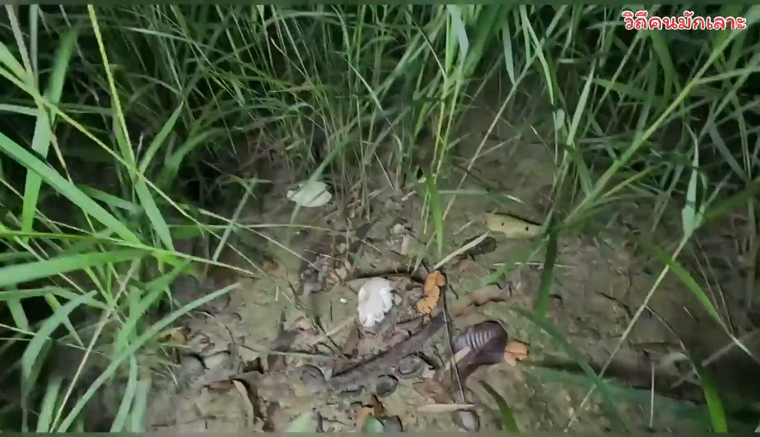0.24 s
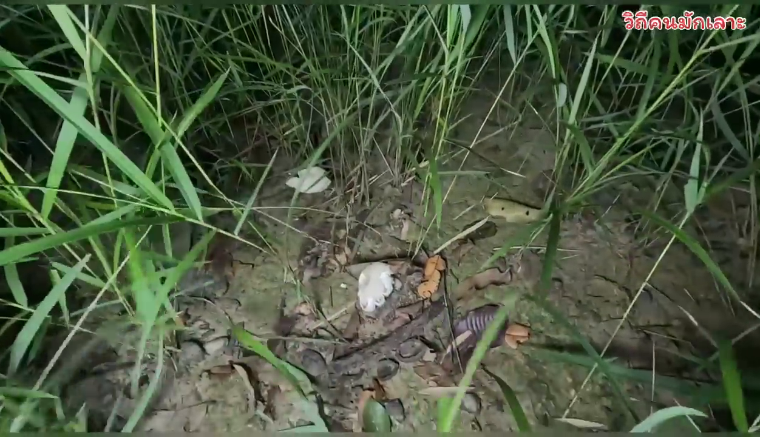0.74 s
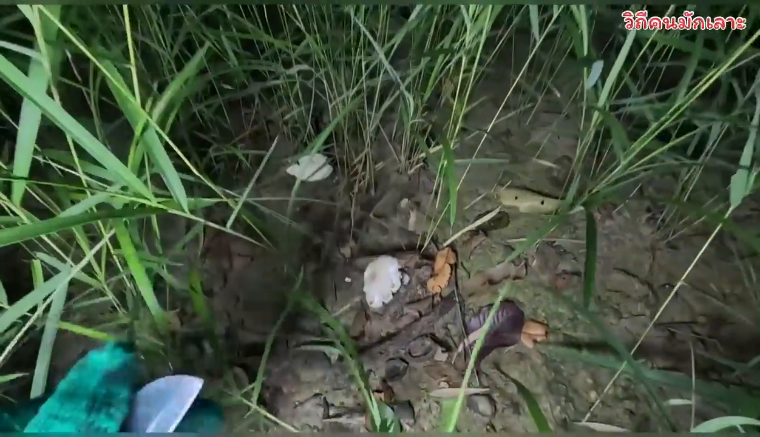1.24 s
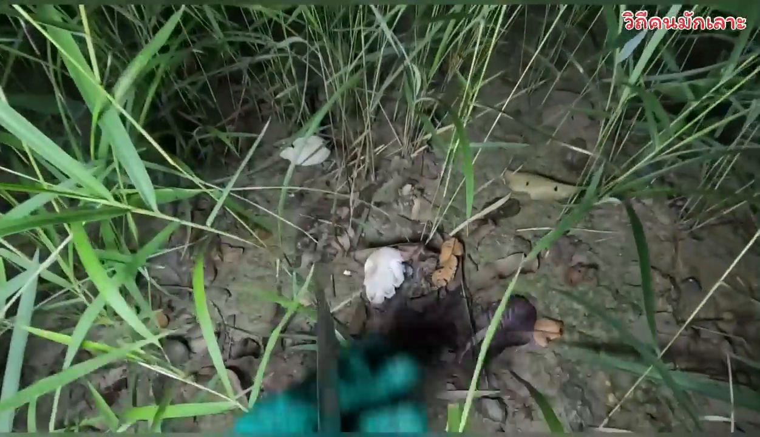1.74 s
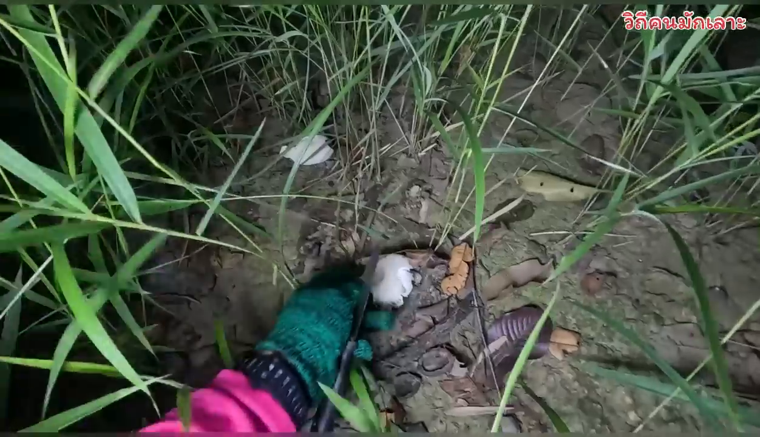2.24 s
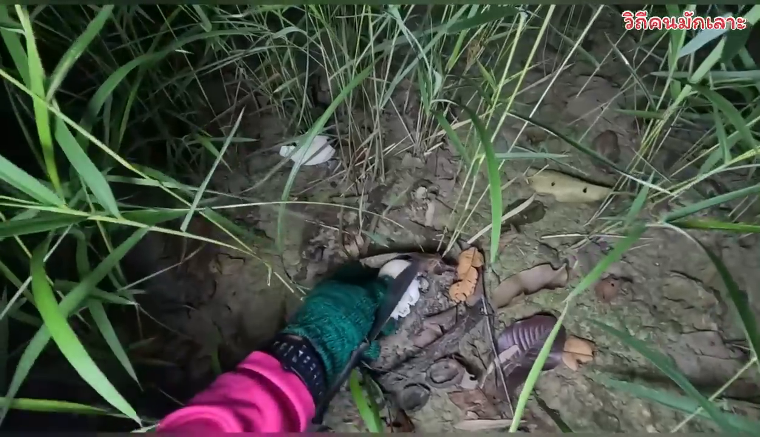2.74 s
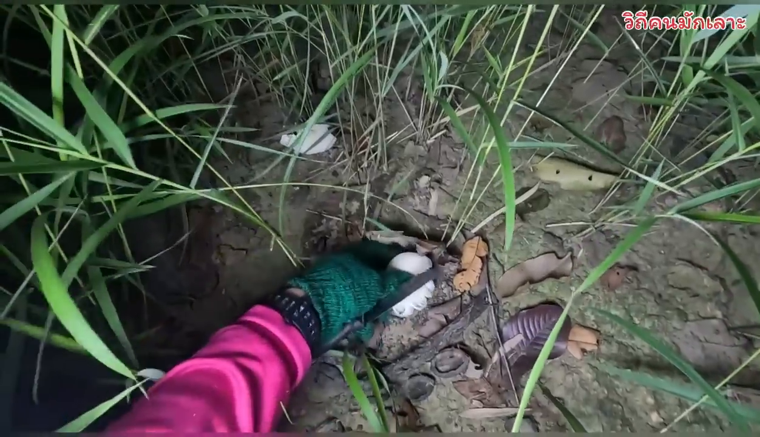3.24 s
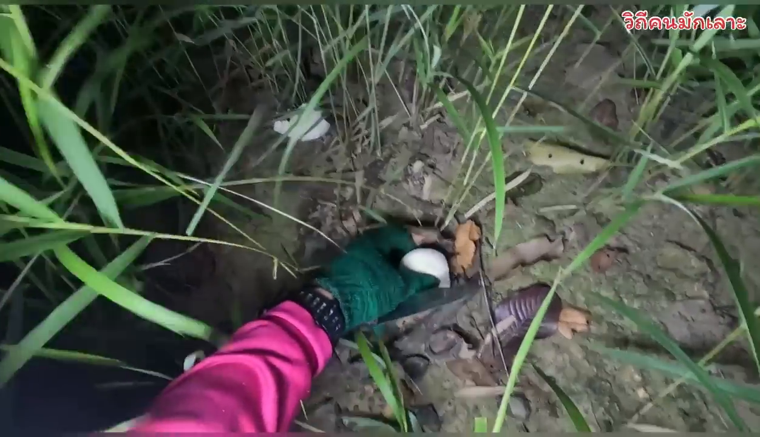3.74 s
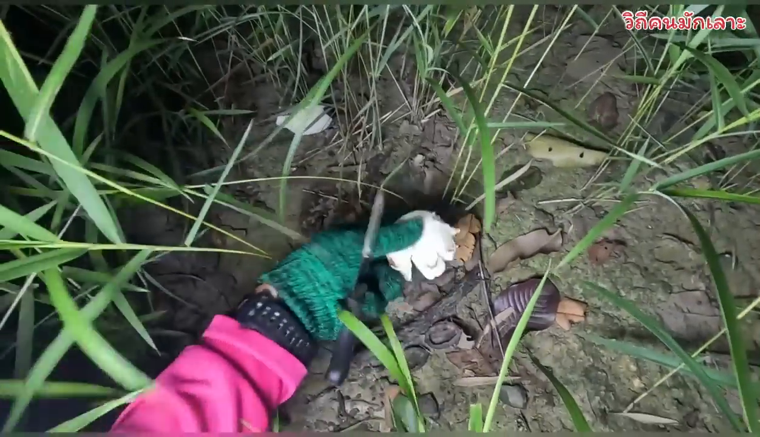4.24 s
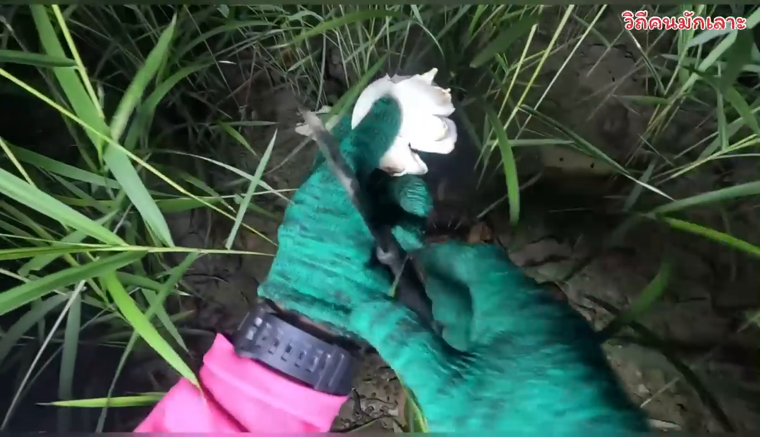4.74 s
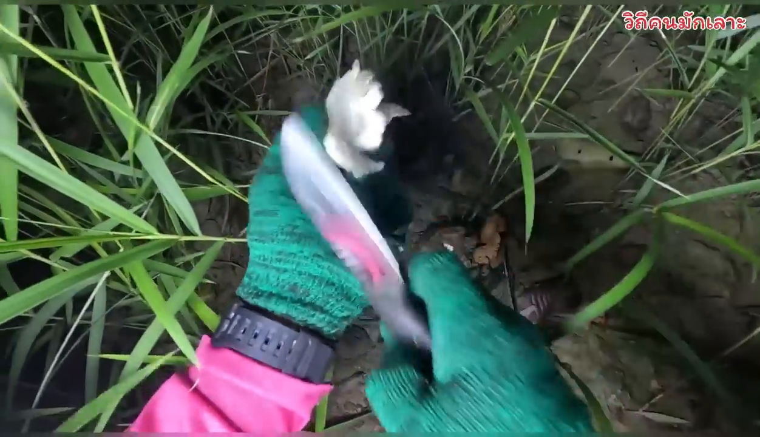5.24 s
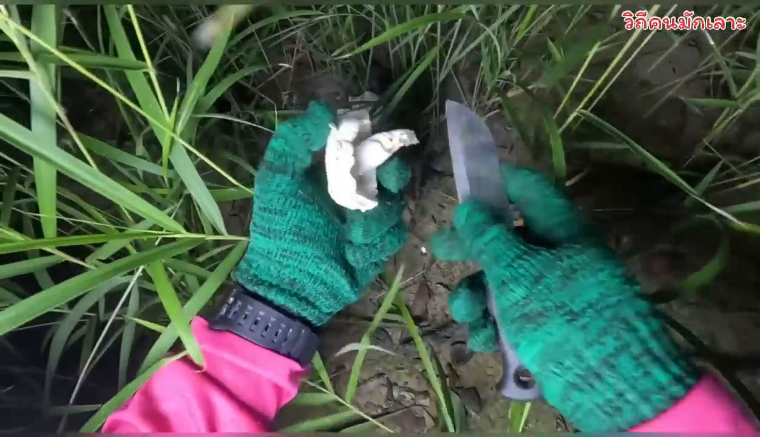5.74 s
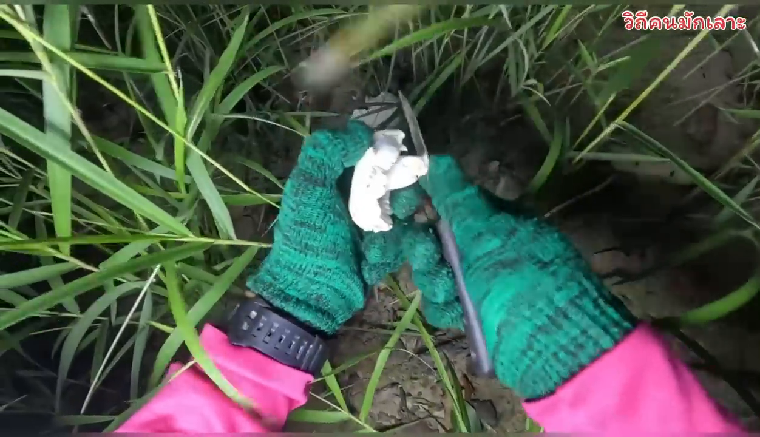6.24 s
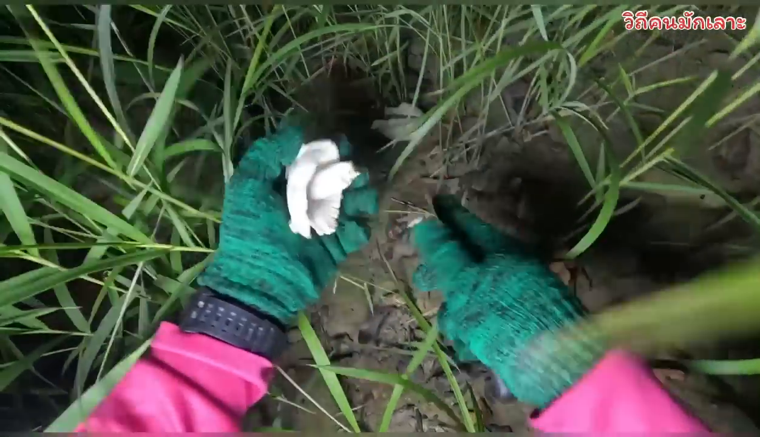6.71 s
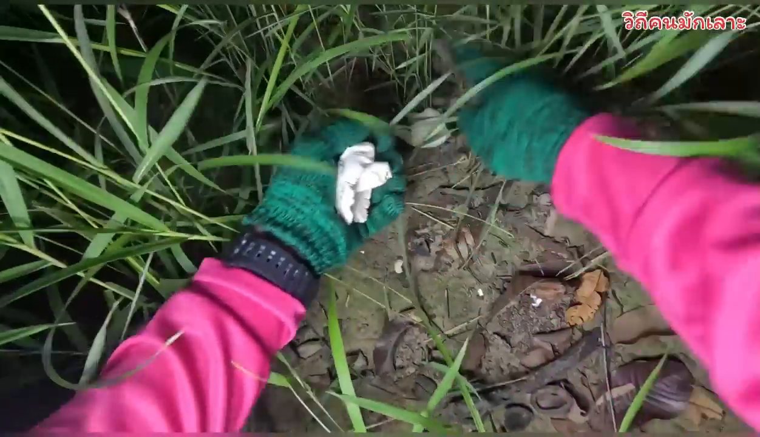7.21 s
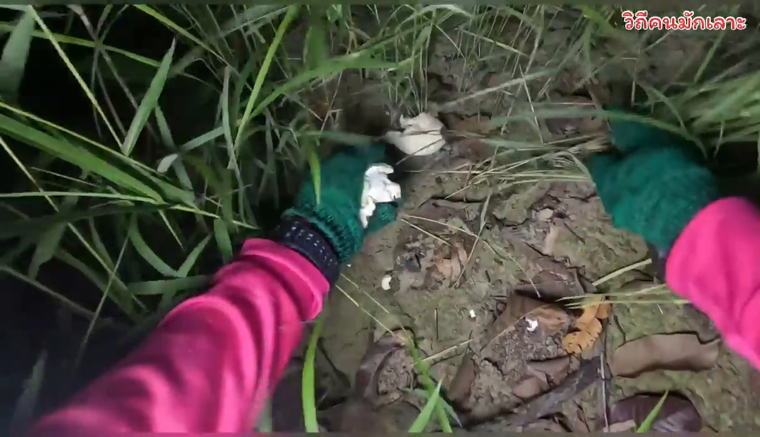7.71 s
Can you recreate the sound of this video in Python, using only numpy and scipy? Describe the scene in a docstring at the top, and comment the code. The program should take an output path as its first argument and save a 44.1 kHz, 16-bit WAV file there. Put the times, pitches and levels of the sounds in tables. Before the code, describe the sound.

Gloved hands push through tall grass with a close, crackling rustle. The leaves quieten as a mushroom is dug out, with sharp snaps of stems and grit. Then a knife trims it in a flurry of clicks, brief scrapes and tiny squeaks, before the rustle rises again. Cloth scuffs and softly bumps the body-worn microphones, while far off what sounds like a slow engine chuffs within a steady hiss.

```python
"""In tall grass, gloved hands push through, dig out a mushroom and trim it with a knife.
Leaves rustle as a dense crackle, stems and grit snap, and the blade scrapes and squeaks.
Two microphones are worn on the body, so cloth scuffs them and bumps their housing.
Far off, what sounds like a slow engine chuffs about nine times a second inside a steady hiss."""
import sys
import numpy as np
from scipy import signal
from scipy.fft import rfft, irfft
from scipy.io import wavfile

SR = 44100
rng = np.random.default_rng(int(sys.argv[2]) if len(sys.argv) > 2 else 0)


def master_out(mix):
    """Clip the mix to full scale and print it as 16-bit PCM to the path in sys.argv[1]."""
    frames = np.transpose(np.atleast_2d(mix))
    ceiling = np.clip(frames, -1, 1)
    pcm = np.round(ceiling * 32767).astype(np.int16)
    wavfile.write(sys.argv[1], SR, pcm)


N = 351477

# how alike left and right are for close sounds: f/Hz, likeness (0 = unrelated, 1 = the same)
NEAR_LIKENESS = [(60, 1), (150, 0.93), (380, 0.82), (950, 0.67), (2380, 0.77), (5980, 0.86), (10000, 0.75),
                 (13000, 0.2)]


def leaves(swish):
    """Leaves crackle over a smooth swish, louder each time a hand brushes past a stalk."""
    steady = [(0, -39), (0.12, -39), (0.27, -39), (0.34, -45.5), (0.56, -40), (0.64, -45.5), (0.73, -45.5),
              (0.88, -41), (1.05, -42), (1.18, -48), (1.45, -54), (1.75, -57.5), (2.9, -59.5), (4.3, -56.5),
              (4.5, -51), (4.95, -53), (5.13, -58), (5.5, -52), (5.9, -53), (6.48, -57), (6.62, -48),
              (6.9, -48.5), (7.31, -50), (7.41, -43), (7.97, -43)]  # the ongoing rustle: t/s, level/dB
    brushes = [(0.4, -45), (1.09, -52), (1.29, -47.5), (1.61, -51.5), (2.41, -50.5), (2.57, -50.5),
               (3.36, -64), (3.66, -51), (4.131, -51.5), (4.75, -48.5), (5.27, -53), (5.57, -55),
               (5.73, -54), (6.32, -47), (6.74, -43), (6.99, -50), (7.45, -47), (7.55, -46.5), (7.64, -45),
               (7.75, -54), (7.919, -51)]  # a hand passes a stalk: t/s, peak/dB
    spectrum = [(350, -5.5), (600, -5.5), (768, -12), (930, -3), (1360, 1), (1480, -2), (2670, 1),
                (2900, 2), (7440, 4), (8890, -1), (10500, -16), (12000, -11), (15800, -26)]  # tone colour of the leaves: f/Hz, relative level/dB
    sheen = [(0, 4), (0.6, -2), (1.3, 3), (2.3, -0.5), (4.5, -1.5), (5.9, -4.5), (6.8, -1.5), (7.97, 1)]  # boost or cut of the highest treble: t/s, gain/dB
    brushing = swells(*np.transpose(brushes), rise_db_per_s=131, fall_db_per_s=109, rest_db=-99)
    gain = np.hypot(from_db(in_time(steady)[0]), brushing)
    source = swish + 0.75 * crackle(per_s=2200, spread_db=3.6)
    rustle = banded(source, spectrum, NEAR_LIKENESS, together_db=0.9, own_db=1.6)
    treble = signal.sosfiltfilt(signal.butter(4, 10400, "high", fs=SR, output="sos"), rustle)
    return gain * (rustle + (from_db(in_time(sheen)[0]) - 1) * treble)


def snaps():
    """Stems and grit snap, each ringing briefly at three pitches; the grass scatters a short tail."""
    # snaps: t/s, bright ring peak/dB, bright ring f/Hz, middle and top ring level/dB (relative to bright)
    big = [(0.194, -31, 4600, 2, -25), (0.579, -30, 5000, 5.5, -25), (0.684, -28, 5370, -12, -25),
           (0.696, -31, 6400, -10, -25), (2.4177, -17.5, 6350, -5, -47), (2.442, -31, 7030, -1, -32),
           (2.465, -32, 6790, -18, -39), (2.6463, -31, 6940, -14, -25), (2.6549, -17, 6900, -5, -31),
           (3.1824, -28, 7200, -27, -15), (3.206, -38, 6970, -20, -20), (3.583, -32, 4520, 10.5, -25),
           (3.8133, -30, 4600, -6, -45), (4.121, -40.5, 6900, 9, -12), (4.4967, -29, 7000, -5, -32),
           (4.6427, -27.5, 6800, 4, -32), (4.966, -30, 6860, -11, -35), (4.972, -32, 6350, -4, -39),
           (4.984, -33, 6740, -11, -36), (4.9975, -30, 6660, -14, -37), (5.0066, -34, 6800, -7, -37),
           (5.017, -34, 6400, -13, -38), (5.025, -30, 6200, -13, -40), (5.041, -27, 6760, -6, -36),
           (5.0554, -27.5, 6050, -5, -43), (5.064, -30, 7150, -9, -37), (5.078, -32, 6930, -8, -39),
           (5.085, -31, 5900, -17, -33), (5.531, -34, 8150, -10, -20), (5.57, -34, 6000, -10, -20),
           (5.573, -29, 7500, -10, -18), (5.576, -32, 5580, 1, -25), (5.582, -39, 6300, -10, -30),
           (5.6, -40, 5800, -8, -26), (5.6228, -28, 7300, -8, -18), (5.625, -30, 5600, -15, -36),
           (5.627, -32, 5770, -11, -34), (5.63, -33, 6000, -10, -34), (5.632, -35, 7100, -6, -35),
           (5.659, -31.5, 6800, -1, -30), (5.776, -37, 5600, -8, -34), (5.9299, -34, 5690, -3, -15),
           (5.8074, -25.5, 6400, -7, -41), (5.8115, -27, 7200, -14, -39), (5.814, -31, 7440, -5, -38),
           (5.8393, -30.5, 7150, -19, -41), (5.971, -33, 6800, -12, -37), (6.24, -35, 4370, -10, -35),
           (6.3878, -24, 6900, 1, -26), (6.4334, -25.5, 7060, -1, -15), (6.464, -39, 6900, -15, -39),
           (6.5752, -36, 6550, -1, -30), (6.72, -33, 6220, -16, -31), (6.731, -37, 6400, -10, -30),
           (6.737, -26, 7100, -15, -32), (6.749, -33, 6000, -8, -30), (6.9997, -27, 5820, -12, -30),
           (7.0506, -38, 6100, 1, -30), (7.3537, -37, 5350, -6, -28), (7.57, -35, 6490, -5, -30),
           (7.754, -33, 6900, -14, -30)]
    # smaller snaps fall at random during the digging and trimming
    small = [(start_s + when * (end_s - start_s), -46 + 6 * size, 5300 + 2600 * pitch, -10, -30)
             for start_s, end_s, count in [(2.3, 4.45, 16), (4.45, 6.5, 70)]
             for when, size, pitch in rng.random((count, 3))]
    direct = np.zeros(N)
    for s, peak_db, bright_hz, mid_db, top_db in big + small:
        mid_hz = np.interp(mid_db, [-5, 3], [3550, 2700])  # fuller snaps ring lower
        mid_hz *= np.exp(.05 * rng.standard_normal())
        rings = [(bright_hz, 11.7 / bright_hz, 0), (mid_hz, 4.4 / mid_hz, mid_db), (12000, .0017, top_db)]
        for hz, t60, level_db in rings:
            add(direct, s + .0009, from_db(peak_db + level_db) * ring(hz, t60, rise_share=0.17))
    tail_s, tail_db = .016, -22
    t = np.arange(int(tail_s * SR)) / SR
    fade = from_db(tail_db - 60 * t / tail_s) * (t > .0008)
    scatter = rng.standard_normal((2, SR // 10))[:, :len(t)] * fade
    return direct + np.array([signal.fftconvolve(direct, side)[:N] for side in scatter])


def scrape():
    """The knife edge slips along the stalk in many tiny jerks, which keep one bright pitch ringing."""
    strokes = [(4.844, 0.2, -54, 6630), (6.961, 0.032, -48, 5680)]  # strokes of the blade: t/s, length/s, level/dB, f/Hz
    width_hz, edge_db_per_s = 600, 700
    clicks = crackle(per_s=1500, spread_db=3.0)[0]
    slips = rms_one(smooth(clicks, width_hz))
    t, out = np.arange(N) / SR, 0
    for s, length, level_db, hz in strokes:
        phase = 2 * np.pi * hz * t
        ringing = slips[0] * np.cos(phase) + slips[1] * np.sin(phase)  # moves the slips up to the pitch
        out = out + held(s, s + length, level_db, edge_db_per_s) * ringing
    return out


def knocks():
    """Squeaks, taps and bumps are soft contacts that ring a few cycles; the housing lingers a little."""
    squeaks = [(6.1948, -38, 1900), (6.1985, -38, 1905), (6.207, -43, 1870), (6.2866, -35, 1806),
               (6.3124, -40, 1850), (6.3215, -35, 1740), (6.3274, -39, 1800), (6.3325, -30.5, 1970),
               (6.3365, -32, 1830)]  # the blade squeaks through the stalk: t/s, peak/dB, f/Hz
    taps = [(0.266, -46, 1110), (0.318, -44, 1030), (0.371, -38.5, 1100), (0.577, -35, 1260),
            (0.623, -38.5, 1020), (2.152, -46, 1265), (3.198, -52, 1050), (3.584, -39.5, 1100),
            (3.646, -45, 1030), (3.815, -46, 1043), (4.12, -45.5, 1010), (4.643, -42.5, 1094),
            (5.28, -51, 1080), (5.574, -47, 1090), (6.389, -38.5, 1100), (7.827, -42.5, 960)]  # dull taps of knife handle and fingers: t/s, peak/dB, f/Hz
    bumps = [(0.168, -37, 314), (0.26, -42, 310), (4.11, -40, 35.6), (0.345, -46, 430), (0.376, -36, 370),
             (0.79, -44, 40), (1.394, -36, 59.4), (1.92, -44, 42), (2.07, -40, 39.4), (2.493, -50, 410),
             (2.8, -38.5, 61.4), (3.348, -54, 559.5), (3.935, -36, 45), (3.937, -44, 196), (4.02, -63, 190),
             (4.404, -49, 302), (6.286, -47, 329), (6.357, -45, 424), (6.416, -51, 280), (6.709, -42, 544),
             (7.485, -45, 425), (0.797, -48, 179), (1.041, -43, 80.7), (1.109, -43.5, 195),
             (1.191, -44, 170), (1.781, -39.5, 186), (1.922, -46, 172), (1.24, -36.5, 52),
             (1.79, -43, 39.7), (2.367, -32.5, 134), (2.375, -47, 45.3), (3.4, -39, 92.5), (3.49, -31, 122),
             (3.495, -27.5, 34.7), (3.85, -33.5, 39.5), (3.842, -45, 176.2), (6.611, -43.5, 242),
             (7.823, -44, 239)]  # knocks against the microphone housing: t/s, peak/dB, f/Hz
    kinds = [(squeaks, 16, 0, .0003), (taps, 11, 0, .0008), (bumps, 2.6, .006, .003)]
    out = np.zeros(N)
    for table, cycles, linger_s, late_s in kinds:
        for s, peak_db, hz in table:
            add(out, s + late_s, from_db(peak_db) * ring(hz, cycles / hz + linger_s, rise_share=0.079))
    return out


def clothing(swish):
    """As the body shifts its weight, cloth scuffs and rubs, and the microphone housing rumbles."""
    shifts = [(0.2, -58, -62.5), (0.28, -59, -75), (0.35, -46, -55.5), (0.62, -50, -65), (0.8, -68, -50.5),
              (1.11, -60, -57), (1.27, -72, -53), (1.55, -59.5, -69), (1.8, -66, -57), (1.94, -85, -63),
              (2.38, -80, -59), (2.5, -67, -94), (2.81, -88, -64.5), (3.15, -87, -59), (3.361, -82, -68),
              (3.41, -83, -61), (3.63, -85, -56.5), (3.85, -63, -57), (3.48, -68, -53), (3.95, -74, -52.5),
              (4.031, -60, -60), (4.35, -62.5, -73), (5.02, -67.5, -53.5), (5.92, -58.5, -64),
              (6.37, -59, -70), (6.64, -58, -64), (7.48, -64, -61), (7.68, -67, -65), (7.8, -56.5, -82)]  # body movements: t/s, scuff peak/dB, rub peak/dB
    housing = [(0, -57), (0.6, -53), (1.4, -51), (1.65, -53), (2.25, -46), (2.7, -55), (3.65, -52),
               (4.12, -55), (4.17, -64), (5.0, -67), (6.1, -67), (6.85, -67), (7.6, -62), (7.97, -62)]  # the rumble before movements add to it: t/s, level/dB
    scuff_spectrum = [(140, -34), (240, -4.5), (335, 0), (615, -6), (1300, -8.5), (1690, -24), (2860, -120)]  # scuffing cloth: f/Hz, relative level/dB
    rub_spectrum = [(50, -30), (90, -9), (130, -5), (175, 0), (250, -9), (340, -24)]  # low rubbing: f/Hz, relative level/dB
    rumble_spectrum = [(8.8, -44), (15, 7), (39, 2), (130, -20), (170, -62), (290, -120)]  # deep rumble: f/Hz, relative level/dB
    s, scuff_db, rub_db = np.transpose(shifts)
    rub_rest_db = -73.5
    scuff_gain = swells(s, scuff_db, rise_db_per_s=94, fall_db_per_s=77, rest_db=-75)
    rub_gain = swells(s, rub_db, rise_db_per_s=189, fall_db_per_s=145, rest_db=rub_rest_db)
    rough_swish = swish[::-1] + .5 * crackle(per_s=250, spread_db=1.5)
    scuff = banded(rough_swish, scuff_spectrum, NEAR_LIKENESS, together_db=2.5, own_db=2.0)
    rub = banded(swish[::-1], rub_spectrum, NEAR_LIKENESS, together_db=4.0, own_db=3.5)
    rumble = banded(swish, rumble_spectrum, NEAR_LIKENESS, together_db=1.0, own_db=1.5)
    thump = (rub_gain / from_db(rub_rest_db)) ** 0.4  # the rumble follows 40% of the rub's rise in dB
    return scuff_gain * scuff + rub_gain * rub + from_db(in_time(housing)[0]) * thump * rumble


def far_engine():
    """Each firing puffs an uneven chuff; hiss and whines dip just before it and swell just after."""
    course = [(0, -46, 2390, 3440, -56), (1.2, -46, 2453, 3490, -55.5), (2.05, -47.5, 2504, 3440, -56),
              (2.2, -48, 2765, 3575, -55.5), (4.4, -49.5, 2787, 3642, -57), (5.5, -50.5, 2670, 3600, -59),
              (6.3, -50.5, 2640, 3435, -58), (6.8, -51, 2693, 3570, -60.5), (7.97, -50, 2710, 3560, -61)]  # the engine: t/s, hiss/dB, low whine f/Hz, high whine f/Hz, low whine/dB
    hiss_spectrum = [(59, -33), (100, -14.5), (224, -10), (832, -27.5), (1600, -1.5), (2200, 2),
                     (2780, 3.5), (3160, 3), (3510, 4.5), (4620, -4.5), (7690, -17.5), (10600, -65),
                     (12000, -33), (14500, -71), (15800, -53)]  # steady hiss: f/Hz, relative level/dB
    chuff_spectrum = [(800, -26), (1100, -7), (1330, 7.5), (1440, -8), (1550, 11.5), (1640, 8.5),
                      (1720, 12), (1900, -75), (2060, 12.5), (2400, -3)]  # the chuffs: f/Hz, relative level/dB
    likeness = [(60, 0.82), (180, 0.21), (550, 0.083), (1650, 0.64), (4970, 0.56), (15000, 1)]  # how alike left and right are for far sounds: f/Hz, likeness (0-1)
    # faint whines, the highest likely an insect: start/s, end/s, first f/Hz, last f/Hz, level/dB
    faint_whines = [(3.25, 3.7, 1610, 1580, -62.5), (0.5, 1.3, 3290, 3320, -61),
                    (2.5, 3.8, 3780, 3780, -65), (2.4, 4.8, 4110, 4110, -64),
                    (2.72, 3.6, 11130, 11370, -87)]
    firings_per_s, slowing_per_s2 = 9.58, .084
    hiss_db, low_hz, high_hz, low_db = in_time(course)
    t = np.arange(N) / SR
    chuff_db = -54 - 1.4 * t
    high_db = -58 - 2.2 * abs(t - 3.7)  # loudest at 3.7 s
    phase = 2 * np.pi * (firings_per_s * t - .5 * slowing_per_s2 * t ** 2 - .35)
    white = rng.standard_normal((2, 2, N))
    hiss = banded(white, hiss_spectrum, likeness, together_db=0.82, own_db=0.05)
    chuff = banded(white[::-1], chuff_spectrum, likeness, together_db=.2, own_db=.5)
    pulses = np.exp(2.4 * np.cos(phase + .3 * drift(4)))  # one per firing, a little early or late
    puffs = rms_one(pulses * from_db(1.2 * drift(5)))
    swell = from_db(0.8 * np.cos(phase - 1.6))
    tones = from_db(low_db) * whine(low_hz, width_hz=36) + from_db(high_db) * whine(high_hz, width_hz=70)
    for start, end, first_hz, last_hz, level_db in faint_whines:
        hz = np.interp(t, [start, end], [first_hz, last_hz])
        tones = tones + held(start, end, level_db, edge_db_per_s=49) * whine(hz, width_hz=16)
    return swell * (from_db(hiss_db) * hiss + tones) + from_db(chuff_db) * puffs * chuff


def whine(hz, width_hz):
    """A tone whose pitch wanders, with a narrow band of noise fluttering around it."""
    wandering_hz = hz + .6 * width_hz * drift(20)
    tone = np.exp(2j * np.pi * np.cumsum(wandering_hz) / SR)
    mid, side = [np.real(tone * (drift(width_hz) + 1j * drift(width_hz))) for _ in range(2)]
    return rms_one(.6 * np.real(tone) + .8 * mid + .6 * side * [[1], [-1]])


def ring(hz, t60, rise_share):
    """A sine that builds up over a share of t60, the seconds its decay takes to fall 60 dB."""
    t = np.arange(int(t60 * SR) + 8) / SR
    shape = (1 - np.exp(-t / (rise_share * t60))) ** 2 * from_db(-60 * t / t60)
    return np.sin(2 * np.pi * hz * t) * shape / shape.max()


def crackle(per_s, spread_db):
    """Four unrelated streams of random clicks of uneven size, as two pairs."""
    size_db = spread_db * np.minimum(rng.exponential(1, (4, N)), 2.5)
    sizes = from_db(size_db) * rng.standard_normal((4, N))
    hits = rng.random((4, N)) < per_s / SR
    return rms_one(sizes * hits).reshape(2, 2, N)


def banded(source, spectrum, likeness, together_db, own_db):
    """Shapes two noise pairs into stereo; half-octave bands flicker both together and on their own."""
    out, flicker_db = 0, together_db * (drift(11) + drift(57))
    edges_hz = 15 * 2 ** np.arange(0, 10.5, .5)
    for k, (low, high) in enumerate(zip(edges_hz, edges_hz[1:])):
        if high < spectrum[0][0] or low > spectrum[-1][0]:
            continue
        band = signal.butter(2, [low, high], "band", fs=SR, output="sos")
        mid, side = signal.sosfilt(band, source[k % 2])  # mid is shared; side is opposite left and right
        alike = np.clip(at_hz(likeness, np.sqrt(low * high)), 0, 1)
        gain = from_db(flicker_db + own_db * drift(23.6))
        out = out + gain * (np.sqrt(1 + alike) * mid + np.sqrt(1 - alike) * side * [[1], [-1]])
    hz = np.maximum(np.arange(N // 2 + 1) * SR / N, 1)
    return rms_one(irfft(rfft(out) * from_db(at_hz(spectrum, hz)), N))


def swells(s, peak_db, rise_db_per_s, fall_db_per_s, rest_db):
    """A gain that swells to each peak and dies away to a resting level."""
    steps = np.arange(0, N, 64)
    since_peak = steps / SR - s[:, None]
    slope = np.where(since_peak < 0, rise_db_per_s, -fall_db_per_s)
    each = from_db(peak_db[:, None] + slope * since_peak)
    power = np.sum(each ** 2, axis=0) + from_db(rest_db) ** 2
    return np.interp(np.arange(N), steps, np.sqrt(power))


def held(start_s, end_s, level_db, edge_db_per_s):
    """A gain that holds from start to end, fading in before and out after."""
    t = np.arange(N) / SR
    outside_s = abs(t - np.clip(t, start_s, end_s))
    return from_db(level_db - edge_db_per_s * outside_s)


def drift(rate_hz):
    """A smooth random wobble of about size 1, drawn at every 40th sample."""
    slow = smooth(rng.standard_normal(N // 40 + 2002), 40 * rate_hz)[2000:]
    return np.interp(np.arange(N) / 40, np.arange(len(slow)), rms_one(slow))


def smooth(x, hz):
    """A gentle low-pass filter: favours changes slower than hz, and raises the level."""
    r = np.exp(-2 * np.pi * hz / SR)
    return signal.lfilter([1], [1, -2 * r, r * r], x)


def from_db(db):
    """Turns decibels into a gain."""
    return 10 ** (np.asarray(db) / 20)


def rms_one(x):
    """Scales a signal to an average (rms) level of 1."""
    return x / np.sqrt(np.mean(x ** 2) + 1e-20)


def in_time(rows):
    """Turns the columns of a time table into curves with one value per sample."""
    s, *columns = np.transpose(rows)
    return [np.interp(np.arange(N) / SR, s, column) for column in columns]


def at_hz(points, hz):
    """Reads a frequency table between its rows, with octaves evenly spaced."""
    table_hz, values = np.transpose(points)
    return np.interp(np.log(hz), np.log(table_hz), values)


def add(out, s, sound):
    """Mixes a short sound in at s seconds."""
    at = int(s * SR)
    out[..., at:at + sound.shape[-1]] += sound[..., :N - at]


def scene():
    """All the sounds as they reach the two microphones."""
    swish = rng.standard_normal((2, 2, N))
    return leaves(swish) + clothing(swish) + far_engine() + snaps() + scrape() + knocks()


def record(dry):
    """The two microphone openings differ in tone colour, and the highest treble is cut."""
    balance = [(60, -5.5), (130, -5.5), (290, -1.5), (640, -1), (1410, 2), (3100, 2), (6820, 0),
               (15000, 8.5)]  # how the openings differ: f/Hz, left minus right/dB
    cutoff_hz = 16150
    hz = np.maximum(np.arange(N // 2 + 1) * SR / N, 1)
    coloured = irfft(rfft(dry) * from_db(at_hz(balance, hz) * [[.5], [-.5]]), N)
    return signal.sosfilt(signal.cheby2(14, 60, cutoff_hz, fs=SR, output="sos"), coloured)


dry = scene()
out = record(dry)
master_out(out)
```